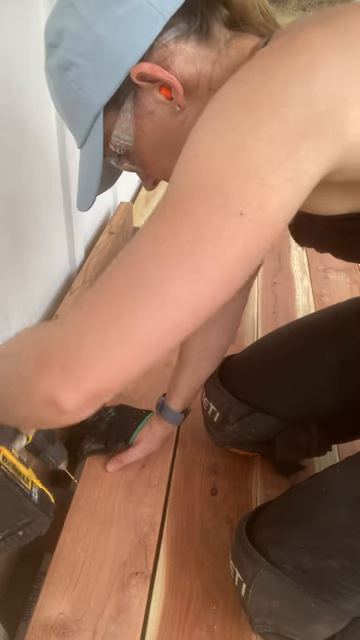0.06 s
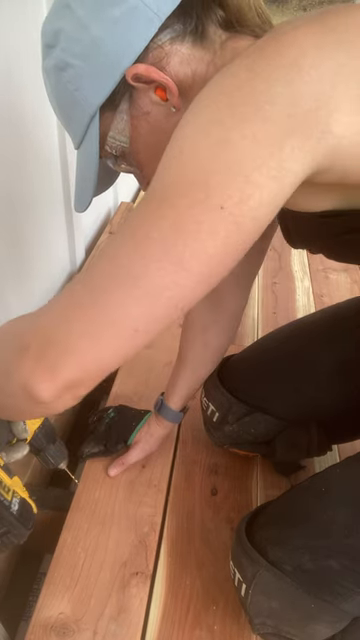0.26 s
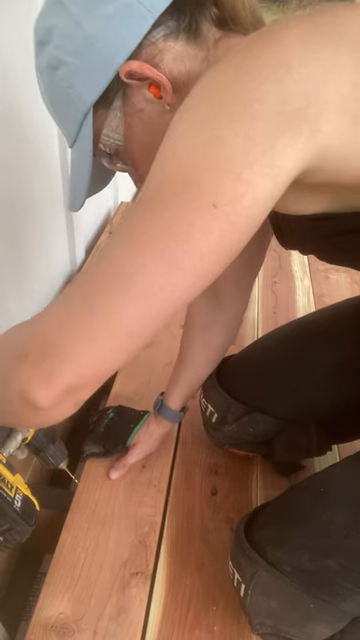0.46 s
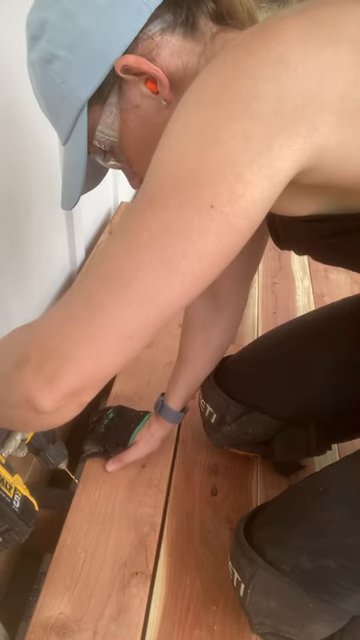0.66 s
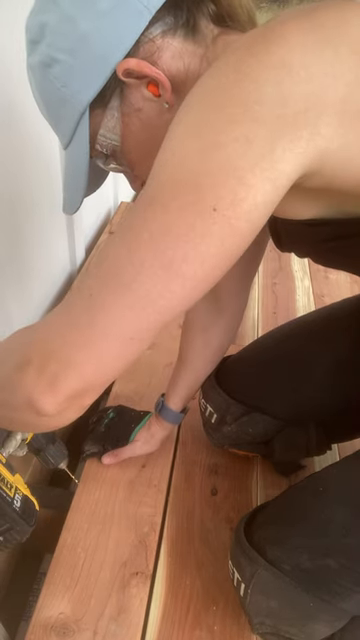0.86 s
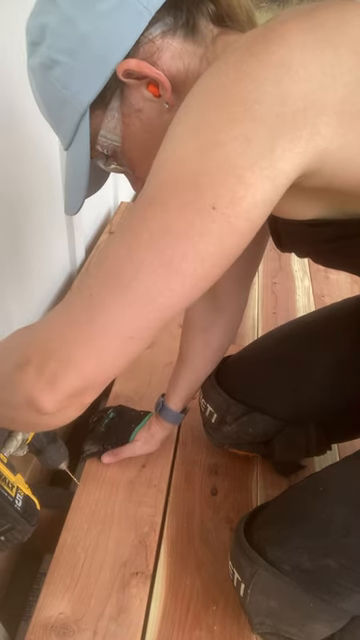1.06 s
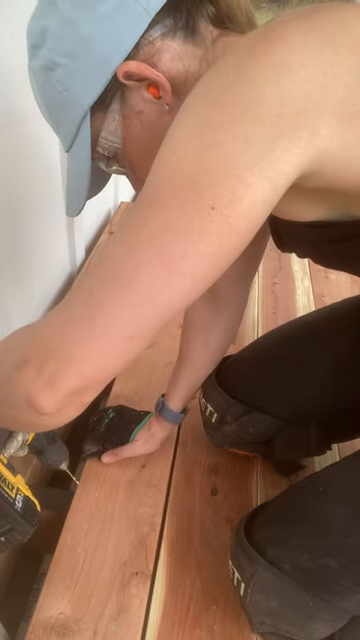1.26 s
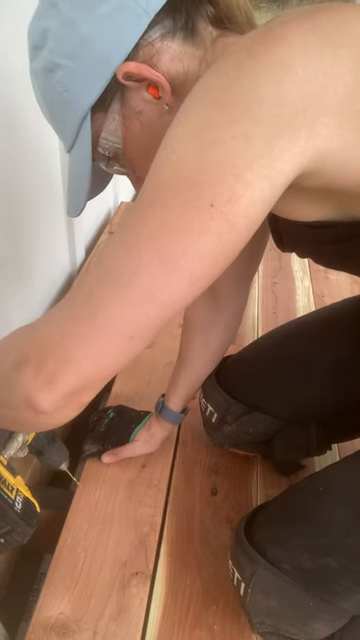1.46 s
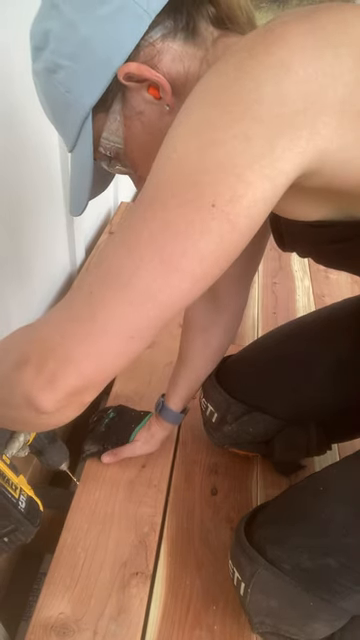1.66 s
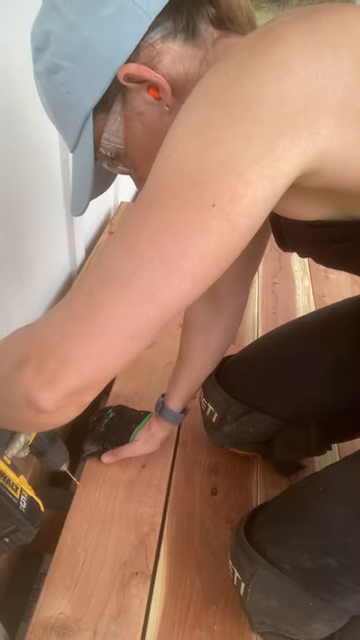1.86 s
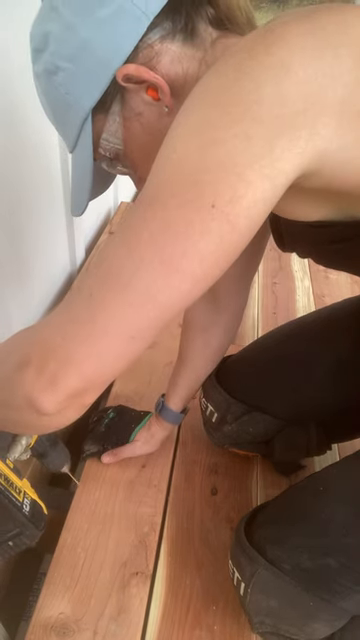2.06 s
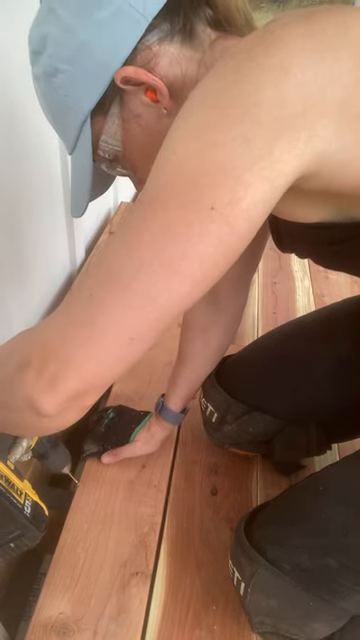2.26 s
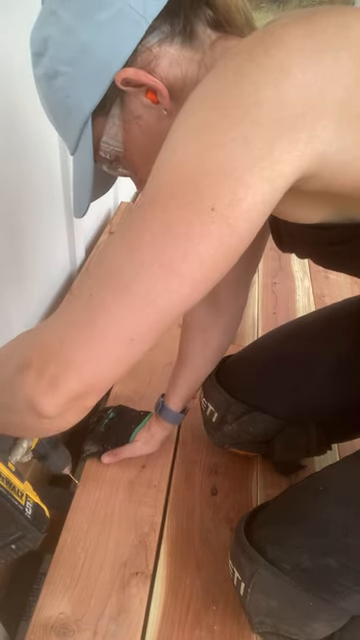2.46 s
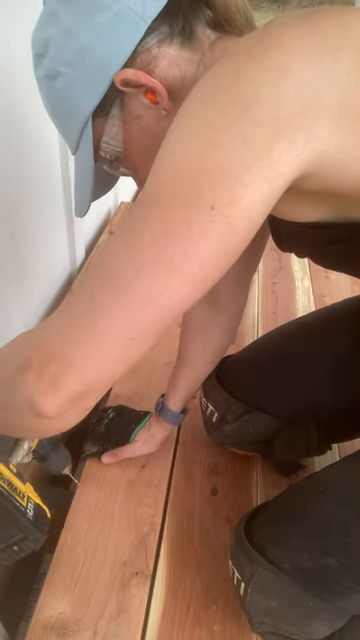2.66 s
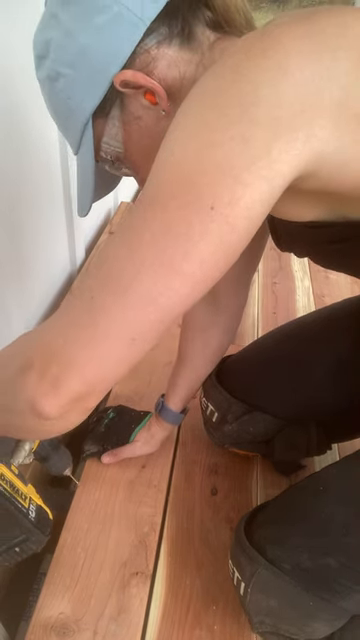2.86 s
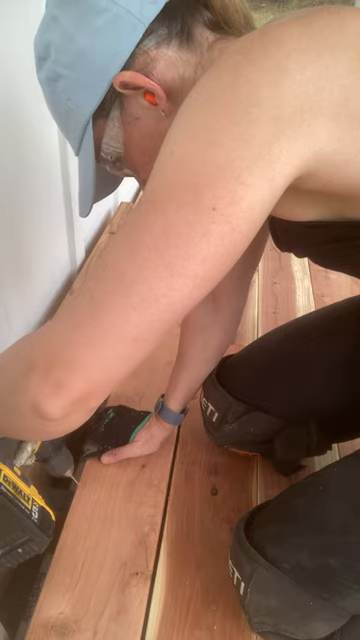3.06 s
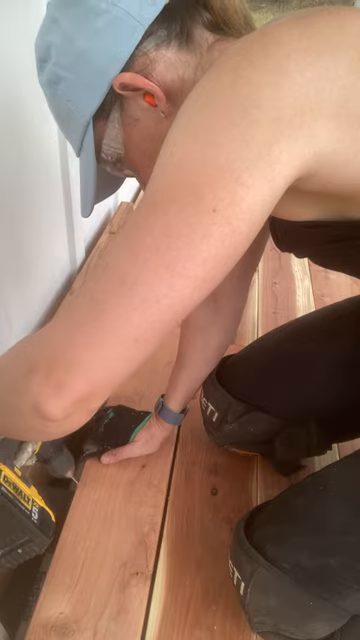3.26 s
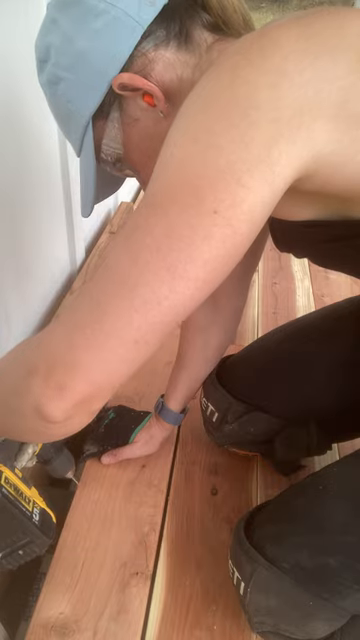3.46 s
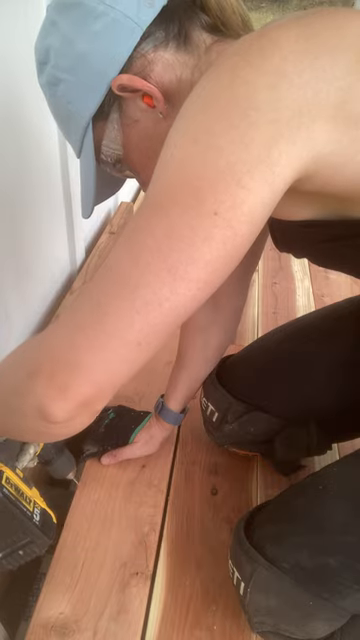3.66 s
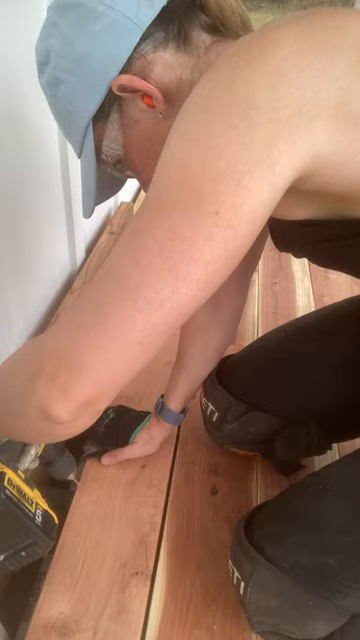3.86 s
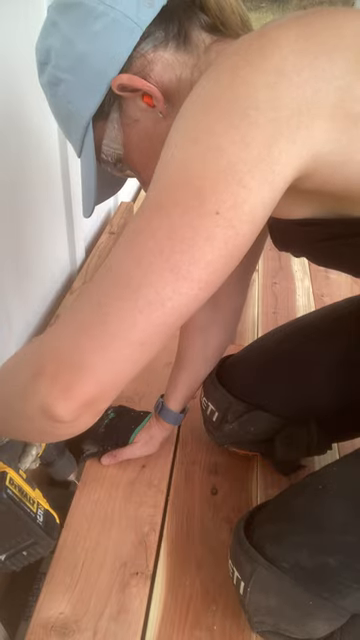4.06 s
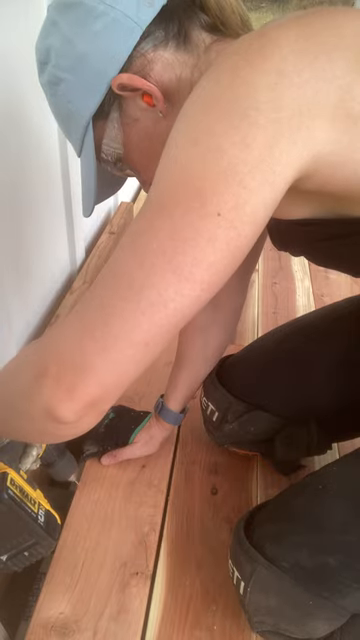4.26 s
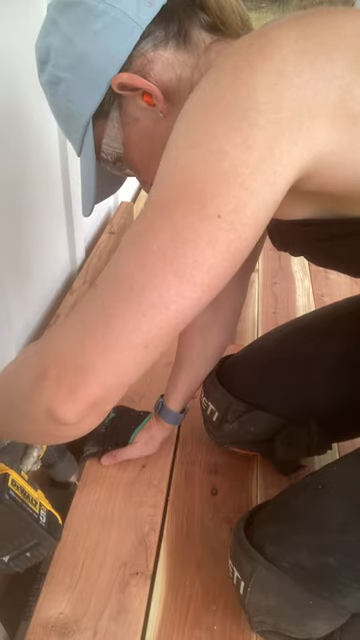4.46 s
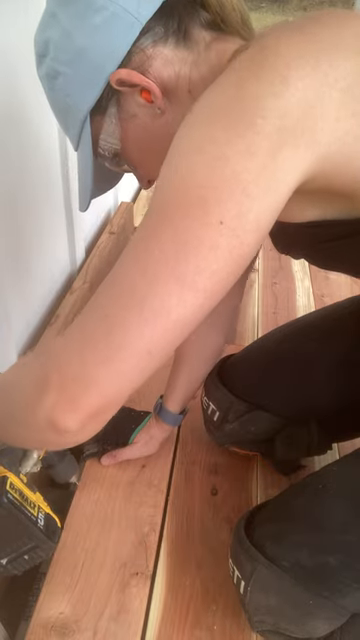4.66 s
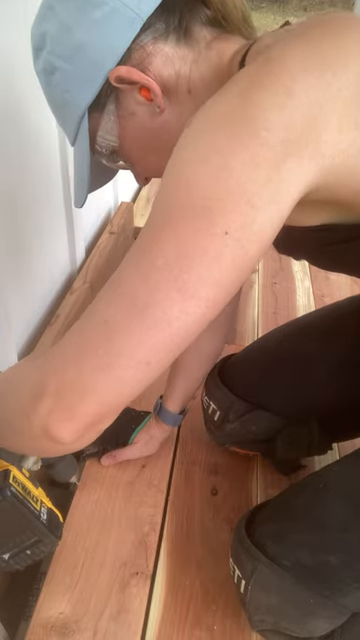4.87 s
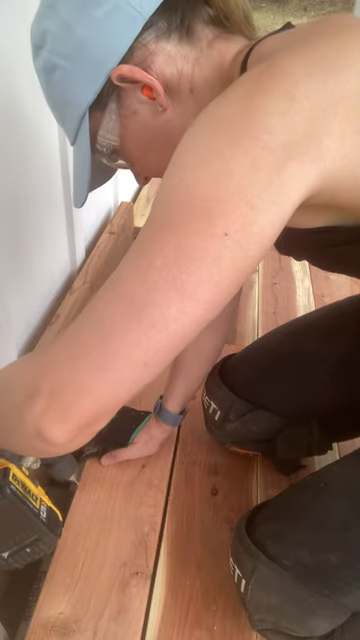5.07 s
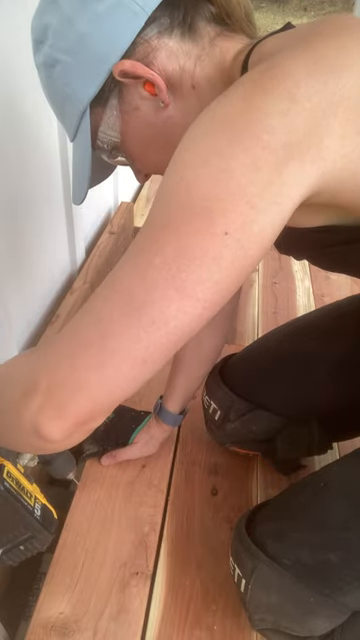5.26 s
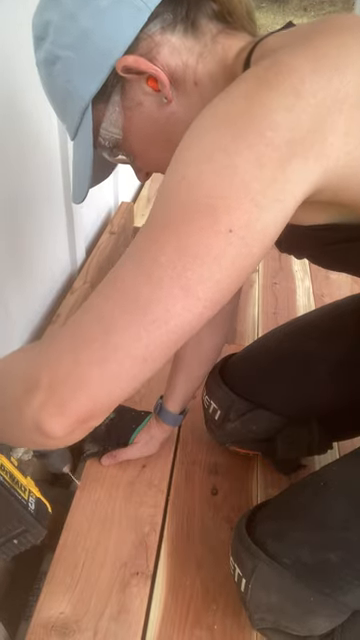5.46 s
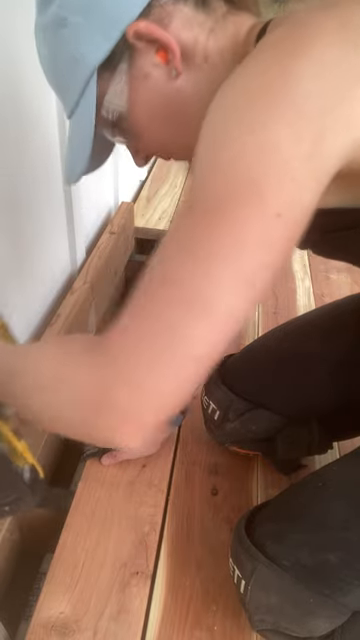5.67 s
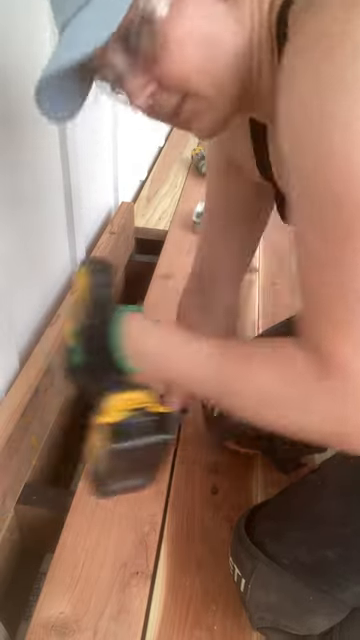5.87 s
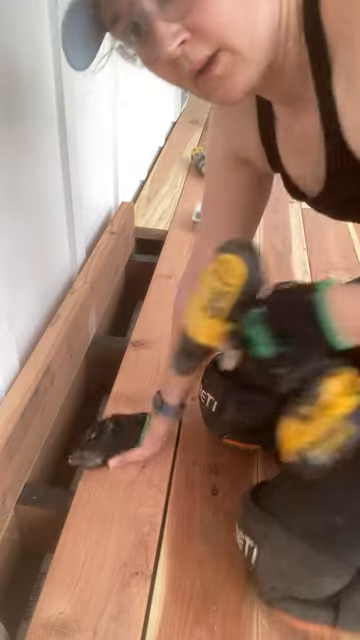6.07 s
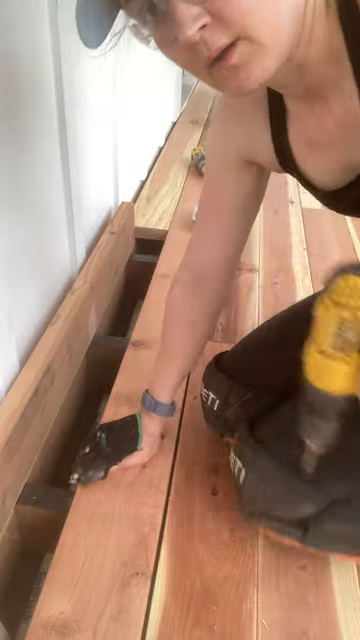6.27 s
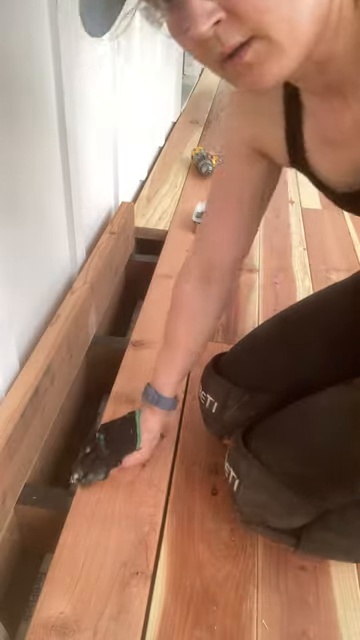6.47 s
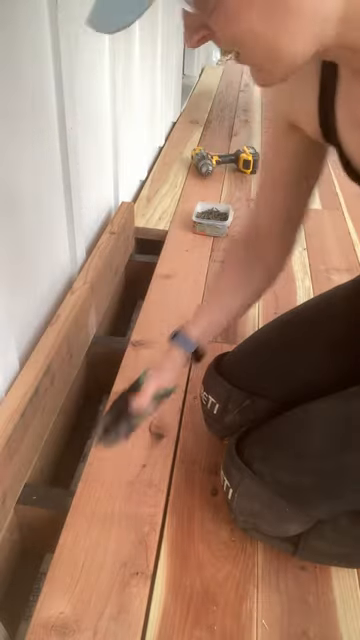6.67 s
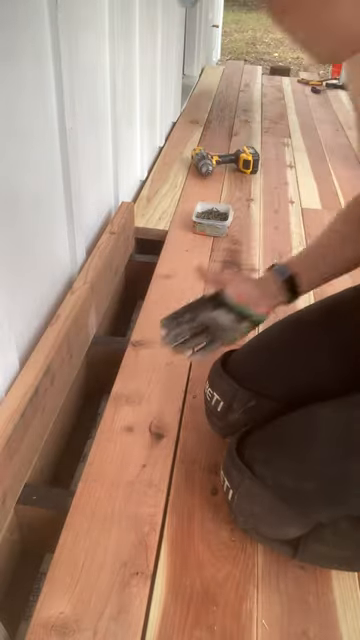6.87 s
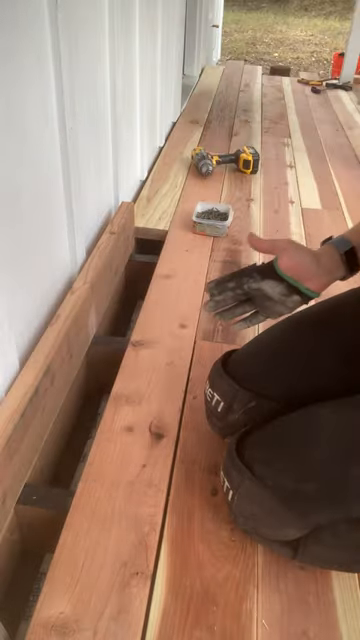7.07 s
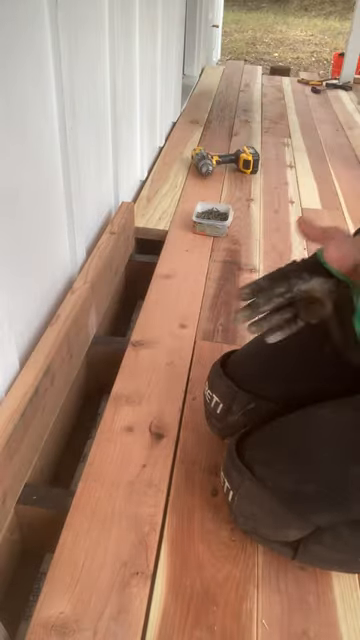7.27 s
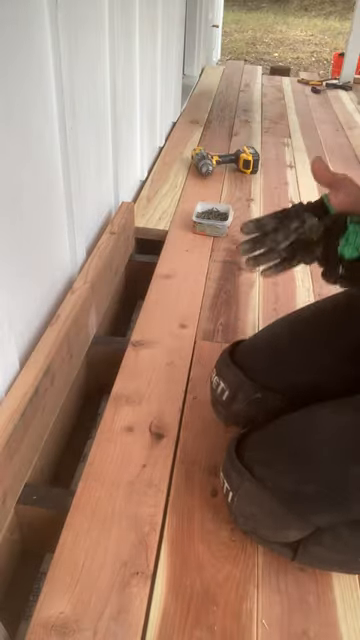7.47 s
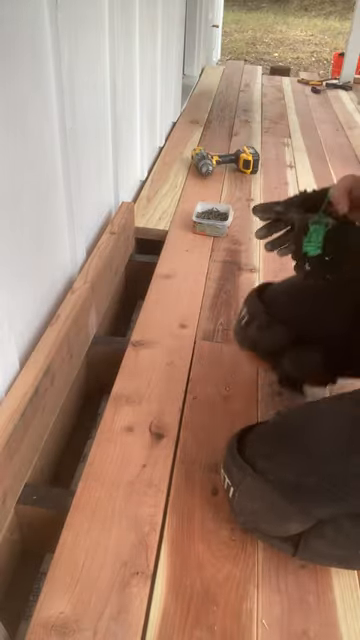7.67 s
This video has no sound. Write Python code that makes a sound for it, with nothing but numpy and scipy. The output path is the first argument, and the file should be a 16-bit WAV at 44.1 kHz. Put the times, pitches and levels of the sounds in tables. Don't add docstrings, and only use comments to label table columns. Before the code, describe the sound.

Knees thump on deck boards, a power drill ramps up and rasps through a long screw drive, stops sharply, cloth rustles, tool clunks down.

```python
import sys
import numpy as np
from scipy import signal
from scipy.fft import rfft, irfft
from scipy.io import wavfile
from scipy.ndimage import uniform_filter1d

SR = 44100
rng = np.random.default_rng(int(sys.argv[2]) if len(sys.argv) > 2 else 0)


def dump_mix(stems):
    frames = np.atleast_2d(stems).T
    limited = np.clip(frames, -1, 1)
    pcm = np.round(limited * 32767).astype(np.int16)
    wavfile.write(sys.argv[1], SR, pcm)


def boost_factor(decibels):
    exponent = np.asarray(decibels, float) / 20
    return 10 ** exponent


N = 340965
HZ = np.fft.rfftfreq(N, 1 / SR)
T = np.arange(N) / SR


def noise():
    return rng.standard_normal(N)


def level(x, db):
    return x * boost_factor(db) / np.sqrt(np.mean(x ** 2))


def shape(table, hz=HZ):
    f, db = np.transpose(table)
    return np.interp(np.log(hz + 1), np.log(f + 1), db)


def peaks(table):
    return sum(db / (1 + ((HZ - hz) / (width / 2)) ** 2) for hz, width, db in table)


def colour(x, db):
    return irfft(rfft(x) * boost_factor(db), N)


def band(x, lo_hz, hi_hz):
    return signal.sosfilt(signal.butter(2, [lo_hz, hi_hz], "band", fs=SR, output="sos"), x)


def walk(rate):
    hold = int(SR / rate)
    steps = np.repeat(rng.standard_normal(N // hold + 1), hold)
    return 1.176 * uniform_filter1d(uniform_filter1d(steps, hold), hold)[:N]


def burst(s, db, t60, rise=0.00078):
    age = np.clip(T - s, 0, 2)
    return boost_factor(db) * np.minimum(age / rise, 1) * 10 ** (-3 * age / t60)


def swells(rows):
    power = 0
    for s, length, *db in rows:
        arc = np.sin(np.pi * np.clip((T - s) / length, 0, 1)).clip(0) ** 0.77
        power = power + (boost_factor(np.array(db))[:, None] * arc) ** 2
    return np.sqrt(power)


# (frequency [Hz], level [dB per Hz])
HUSH = [(59, -34), (100, -14), (206, -12), (373, -17.5), (406, -8.5), (502, -22), (691, -17.5), (3050, -40),
        (10900, -39), (16000, -46)]
# (start [s], length [s], joist boom [dB], wind [dB])
SWAYS = [(.05, 0.35, -66, -57), (.44, 0.16, -67, -68), (.85, 0.65, -51.5, -58), (1.5, 1, -52, -63),
         (2.25, 0.52, -51.5, -63), (2.8, 0.25, -48.5, -68), (3.2, 0.35, -56, -52), (3.55, 0.21, -54, -58),
         (3.7, 0.59, -46.5, -64), (4.55, 0.67, -43, -62), (5.15, 0.63, -50, -49), (5.9, 0.17, -60, -56),
         (6.1, 0.68, -58, -58), (6.88, 0.18, -41, -60), (7.05, 0.19, -54, -40), (7.3, 0.22, -55, -58)]


def air():
    boom_gain, wind_gain = swells(SWAYS)
    hush = level(colour(noise(), shape(HUSH)), -69)
    boom = level(band(band(noise(), 85.4, 124.0), 51, 195), 0)
    wind = level(band(band(noise(), 43.0, 78.0), 30, 98), 0)
    breeze = boost_factor(-70 + 2.5 * T)
    return hush + boom * np.hypot(boom_gain, boost_factor(-62.5)) + wind * np.hypot(wind_gain, breeze)


# (start [s], length [s], cloth hiss [dB], scrape [dB])
RUSTLE = [(-.05, 0.098, -93, -69), (.13, 0.19, -72.5, -74), (.33, 0.3, -82, -69.5), (.36, .09, -72, -85),
          (.45, 0.37, -78.5, -92), (.8, 0.088, -75, -90), (5.73, 0.033, -60, -50.5),
          (5.76, .13, -64, -54.5), (5.88, 0.21, -65, -67), (6.0, 0.27, -56.5, -56),
          (6.115, 0.054, -51, -45), (6.14, 0.16, -55.5, -55), (6.27, 0.1, -55, -52),
          (6.38, 0.12, -58.5, -62), (6.5, 0.23, -49.5, -59), (6.748, 0.027, -51, -48),
          (6.76, 0.06, -54.5, -60), (6.84, 0.23, -58, -59), (7.0, 0.15, -59, -47), (7.21, .065, -68, -56.5),
          (7.33, 0.088, -55.5, -55.5), (7.4, 0.094, -57.5, -51.5), (7.45, 0.42, -84, -58.5),
          (7.52, 0.12, -65, -70)]
# (frequency [Hz], level [dB per Hz])
CLOTH = [(120, -4), (200, -1), (350, -5), (689, -11), (941, -5), (1260, -9), (1700, -9.5), (2650, -13.5),
         (3350, -15), (8560, -15.5), (16000, -20)]
# (start [s], end [s], pitch [Hz], width [Hz],
# level [dB])
SQUEAKS = [(4.92, 5.39, 455, 81, -43), (0.97, 1.51, 256, 53, -53.5), (5.44, 5.623, 150, 50, -49),
           (5.72, 5.87, 2430, 610, -56), (6.16, 6.32, 1930, 790, -60), (6.5, 6.68, 1900, 970, -59),
           (5.93, 4.3, 4650, 540, -77), (5.74, 5.9, 8500, 900, -69), (6.7, 6.2, 7400, 400, -81),
           (0.2, 0.27, 4000, 500, -80), (0.4, .54, 5000, 700, -82), (6.17, 6.29, 4600, 300, -61),
           (6.5, 6.852, 3350, 450, -65)]


def rustle():
    grains = noise() * boost_factor(2.0 * walk(300) + 1.0 * walk(40))
    cloth = rfft(grains) * boost_factor(shape(CLOTH))
    bright = 1 / (1 + (2800 / (HZ + 1)) ** 6)
    hiss = level(irfft(cloth * bright, N), 0)
    scrape = level(irfft(cloth * (1 - bright), N), 0)
    stir = np.outer(boost_factor(np.array((-65.5, -60.5))), T > 4.4)
    out = np.sum(np.hypot(swells(RUSTLE), stir) * [hiss, scrape], axis=0)
    for t0, t1, hz, width, db in SQUEAKS:
        swell = np.sin(np.pi * np.clip((T - t0) / (t1 - t0), 0, 1)) ** 0.81
        out = out + swell * level(band(grains, hz - width / 2, hz + width / 2), db)
    return out


# (time [s], peak [dB], pitch [Hz], t60 [s])
TICKS = [(0.104, -28, 8200, 0.02), (0.1217, -25.5, 4500, 0.02), (0.141, -36, 4000, 0.017),
         (0.4614, -59, 4960, 0.015), (0.5571, -58, 4170, 0.015), (0.6115, -50, 7660, 0.012),
         (0.7856, -59, 8290, 0.015), (0.8175, -50, 7840, 0.015), (6.2901, -42, 3390, .015),
         (6.396, -35, 6260, 0.015), (6.4373, -37, 8340, 0.015), (6.472, -33, 8420, 0.015),
         (6.5096, -41, 8650, 0.015), (6.5231, -41, 4220, .015), (6.5544, -38, 3480, 0.014),
         (6.685, -30, 7680, 0.017), (6.7134, -26.5, 5000, 0.015), (6.719, -34, 5200, .012),
         (6.728, -33, 7500, .012), (6.744, -34, 5200, .012), (6.751, -36, 5300, .012),
         (6.758, -25, 7160, 0.01), (6.8379, -35, 7530, 0.015), (6.86, -37, 3320, 0.013),
         (6.8936, -33, 3500, 0.013), (6.905, -38, 7500, .012), (6.914, -42, 5200, .012),
         (6.925, -20, 4220, 0.014), (6.9455, -31, 8500, .012), (7.0284, -25, 3210, 0.0075),
         (7.0525, -9, 3520, 0.0098), (7.15, -39, 8500, .012), (7.1596, -38, 3200, 0.015),
         (7.1865, -33, 4170, 0.012), (7.214, -38, 3290, 0.015), (7.243, -33.5, 3160, 0.011),
         (7.251, -38, 3300, .02), (7.283, -33, 3220, 0.012), (7.305, -44, 3330, 0.018),
         (7.3462, -40, 7460, 0.015), (7.386, -39, 8000, .012), (7.417, -31, 8780, 0.012),
         (7.4425, -38, 4750, 0.013), (7.4599, -31.5, 9500, 0.013), (7.575, -46, 8500, .015)]
# (time [s], peak [dB], pitch [Hz], t60 [s])
TAPS = [
    (0.103, -31.5, 880, 0.13),
    (0.352, -44.5, 1500, 0.028),
    (.838, -56, 4000, .08),
    (6.079, -51, 861, 0.05),
    (6.134, -31.5, 950, 0.046),
    (6.329, -56, 890, 0.05),
    (6.759, -32, 990, 0.042),
]


def ticks():
    click = noise()
    wide = level(band(click, 2700, 14300), -12.0)
    out = 0
    for s, db, hz, t60 in TICKS:
        out = out + burst(s, db, t60) * (level(band(click, hz, hz * 1.07), -15.0) + wide)
    for s, db, hz, t60 in TAPS:
        out = out + burst(s, db, t60) * level(band(click, hz * 0.66, hz * 1.37), -8.0)
    return out


def ring(force, modes, lag):
    out = 0
    for k, (hz, db, t60) in enumerate(modes):
        late = np.roll(force, int(lag / np.sqrt(hz) * SR))
        for twin in (1, 1.04):
            pole = np.exp(2j * np.pi * hz * twin / SR - np.log(1000) / (t60 * SR))
            out = out + (-1) ** k * boost_factor(db) * signal.lfilter([1], [1, -pole], late).imag
    return out


def knocks(hits, modes, gain_db, rattle_db, rattle_t60, lag):
    force, crack, rattle = np.zeros(N), 0, noise()
    for s, db, ms, crack_db in hits:
        contact = np.clip((T - s) / (ms / 1000), 0, 1)
        force += boost_factor(db) * np.sin(np.pi * contact) / (ms * SR / 1000)
        force += boost_factor(rattle_db) * burst(s, db, rattle_t60) * rattle
        crack = crack + burst(s, db + crack_db, 0.016, 0.003) + burst(s, db + crack_db - 10.5, 0.12, 0.0095)
    wood = [(300, -25), (900, 12.0), (2000, 7.0), (2900, 3.5), (3600, 8.5), (4600, 0.0), (8000, -1.0), (16000, -17)]
    return boost_factor(gain_db) * band(ring(force, modes, lag), 40, 5000) + crack * colour(noise(), shape(wood))


# (time [s], peak [dB], contact [ms], crack re blow [dB])
THUDS = [
    (0.114, -19.5, 9.5, -20.5),
    (0.189, -38, 2.8, -40),
    (0.34, -25, 4.2, -39),
    (0.41, -43, 3.7, -38),
]
# (frequency [Hz], level [dB], t60 [s])
JOIST = [(65, -13.5, .4), (96, 2.5, 0.12), (121, 2, 0.22), (171, -15, 0.21), (230, -10.5, 0.092),
         (422, -24, 0.073), (560, -28, 0.068), (745, -27, 0.032)]


def knees():
    return knocks(THUDS, JOIST, -1.7, -31.0, 0.18, 0.0275)


# (time [s], peak [dB], contact [ms], crack re blow [dB])
BLOWS = [
    (6.926, -4, 1.68, -21.5),
    (6.943, -14.5, 2.1, -35),
    (7.023, -12, 1.8, -17),
    (7.051, 2.5, 0.61, -16.5),
    (7.065, -6.5, 1.15, -39.5),
    (7.087, -20, 1.2, -41),
    (7.119, -20.5, 1.6, -33),
]
# (frequency [Hz], level [dB], t60 [s])
DECK = [(100.7, -6, 0.33), (123.2, -8, 0.39), (160, -8.5, 0.33), (230.6, -0.5, 0.3), (258, -1.5, 0.31),
        (308, 3, 0.27), (330, -4.5, 0.3), (410, -2.5, 0.14), (522, 0, 0.09), (615, 4.5, 0.055),
        (722, -2.5, 0.034), (918, -1, 0.048), (1080, -20, 0.045), (1390, -16.5, 0.073), (1550, -18, 0.035)]


def tool_set_down():
    return knocks(BLOWS, DECK, -15.0, -31.5, 0.098, 0.016)


# (time [s], commutator tone the rotor heads for [Hz])
TRIGGER = [(.85, 1250), (1.04, 1360), (1.2, 1530), (1.34, 1530), (1.65, 1850), (1.72, 2150), (1.84, 2250),
           (1.86, 3255), (2.845, 3250), (2.86, 3893), (4.2, 3893), (4.64, 3865), (4.7, 3520), (4.86, 3280),
           (4.92, 3380), (5.1, 3345), (5.3, 3372)]
# (time [s], level [dB])
EFFORT = [(0.84, -56), (1.06, -46.5), (1.27, -42.5), (1.73, -39), (1.85, -36.5), (1.99, -34.5),
          (2.09, -33.5), (2.25, -33), (2.5, -32), (2.85, -30.5), (2.98, -28.5), (3.21, -27), (3.58, -27),
          (4.11, -27), (4.66, -27), (4.9, -27.5), (5.12, -29.5), (5.42, -32.5)]
BARS = 12
SEATED_S, STOP_S = 5.42, 5.712


def motor():
    s, aim_hz = np.transpose(TRIGGER)
    lag = 1 / (0.22 * SR)
    bar_hz = signal.lfilter([lag], [1, lag - 1], np.interp(T, s, aim_hz, left=0))
    stall_hz = 9400 * np.clip(T - SEATED_S, 0, STOP_S - SEATED_S) ** 2
    engage = np.clip((T - EFFORT[0][0]) / 0.03, 0, 1) ** 2
    gate = engage * boost_factor(-60 * np.clip(T - STOP_S, 0, 1) / 0.081)
    return (bar_hz - stall_hz) / BARS, stall_hz, np.interp(T, *np.transpose(EFFORT)), gate


# (frequency [Hz], rms level [dB])
SWITCH = [(3919, -82), (7838, -56), (11763, -61.5), (15680, -74)]
# (time [s], level [dB])
SWITCH_FADE = [
    (.833, -25),
    (.845, 0),
    (1.3, 1),
    (1.9, -2),
    (2.4, -16),
]


def speed_switch(turn):
    chop = sum(boost_factor(db) * np.sin(2 * np.pi * hz * T) for hz, db in SWITCH)
    fade = boost_factor(np.interp(T, *np.transpose(SWITCH_FADE), left=-150, right=-150))
    return np.sqrt(2) * fade * chop * (1 + .5 * np.sin(turn * 3))


# (time [s], peak [dB], pitch [Hz])
BRAKE = [
    (5.681, -16, 1920),
    (5.706, -13, 1980),
]


def brake():
    out = 0
    for s, db, hz in BRAKE:
        out = out + burst(s, db, 0.015) * level(band(noise(), hz * 0.63, hz * 1.24), -9.0)
    return out


# (low edge [Hz], high edge [Hz], level re effort [dB], loss from 2.8 s on, once the shaft runs
# at full speed [dB])
FANS = [(15150, 15550, -12, 8), (14400, 14800, -20, 1)]


def vents(rasp, shaft_hz, effort_db):
    out = 0
    for lo_hz, hi_hz, db, drop_db in FANS:
        fan = boost_factor(effort_db + db - drop_db * (T >= 2.8))
        fan = fan * np.clip(shaft_hz / 190, 0, 1) ** 2
        out = out + fan * level(band(rasp, lo_hz, hi_hz), 0)
    return out


# (frequency [Hz], level re effort [dB])
BAR_TONE = [(400, -14), (830, -29), (1330, -8.5), (1500, -9), (1680, -19), (1850, -9), (2300, -13),
            (2850, -9), (3100, -8), (3250, -8.5), (3400, -12.5), (3850, -10.5)]
# (frequency [Hz], level re effort [dB])
PLANET_TONE = [(150, -17), (340, -15), (470, -20), (600, -24), (850, -16), (1050, -11), (1250, -14),
               (1340, -18), (1400, -10), (1600, -24)]


def motor_tones(turn, shaft_hz, stall_hz, effort_db, pull):
    waver_db = 2.3 * pull - 1.5 + 2.06 * walk(30) + 1.6 * walk(7.9)
    bar_db = effort_db + shape(BAR_TONE, BARS * shaft_hz) + waver_db - 9 * (stall_hz / 650) ** 4
    bars = np.sqrt(2) * boost_factor(bar_db) * np.sin(BARS * turn)
    planet_order = 4.96
    planet_db = effort_db + shape(PLANET_TONE, planet_order * shaft_hz) + 3.8 * walk(45) + 7 * (shaft_hz < 120)
    jitter = np.minimum(shaft_hz / 120, 2.4) * walk(110)
    return bars + boost_factor(planet_db) * np.sin(planet_order * turn + jitter)


STRONG = {4: 7, 5: 3, 6: 4, 7: 6, 8: 0, 9: 0, 10: 8, 11: 8, 12: -20, 13: 3, 14: 0, 15: 8, 16: 7.5, 17: 3,
          18: 2, 19: -1, 20: 10.5, 21: 12, 22: 9.5, 24: 8, 25: 13.5, 26: 8, 27: 8.5, 28: 8, 30: 16.5, 31:
          10.5, 32: 11, 33: 10, 35: 11, 36: 10.5, 39: 7, 37: 7, 41: 13, 44: 3, 58: 10, 59: 11, 47: 12, 48:
          12, 51: 13, 54: 7, 57: 11, 60: 11, 69: 14}
WAKING = {11: 0, 45: -4, 49: 6, 13: 9, 15: 9, 27: 6, 30: -5, 32: -7, 33: -8, 34: -3, 35: 1, 41: 3, 25: -3,
          47: 2}
SLEEPING = {25: -4, 30: -6, 36: -3, 41: -11, 47: -4, 48: -5, 51: -6, 54: -4, 57: -5, 20: -3, 22: -3, 60: -3,
            67: 6, 69: -6}
LOADED = {5: 5, 15: 3, 27: -3, 31: 2, 33: 2, 35: -3, 38: 5, 39: 4, 40: 3, 41: 5, 54: 7, 56: 3}
PULLING = {20: 2, 23: 3, 25: 3, 26: 4, 27: 7, 30: 3, 35: 2, 36: 7, 38: 4, 39: 3, 51: 1}


def shaft_orders(turn, shaft_hz, stall_hz, pull):
    wander = [0.73 * (walk(10) + walk(45)) for _ in range(6)]
    awake = np.interp(shaft_hz, (290, 319), (0, 1))
    asleep = np.interp(shaft_hz, (240, 258), (1, 0))
    loaded = np.interp(T, (4.85, 4.97), (0, 1))
    comb = 0
    for k in range(4, 72):
        db = STRONG.get(k, 6.0) + WAKING.get(k, 0) * awake + SLEEPING.get(k, 0) * asleep
        db = db + LOADED.get(k, 0) * loaded + PULLING.get(k, 0) * pull * (1 - asleep / 2)
        db = db + 2.3 * np.roll(wander[k % 6], 9000 * k)
        audible = shaft_hz * k < .45 * SR
        comb = comb + audible * boost_factor(db) * np.sin(k * turn + k * k)
    return comb * np.clip(shaft_hz / 270, 0, 1) ** 0.71 * boost_factor(-12 * stall_hz / 1000)


def shaft_hum(turn):
    hum = boost_factor(13.0 + 2.0 * walk(18)) * np.sin(turn) + boost_factor(8.0 + 4.0 * walk(16)) * np.sin(0.79 * turn)
    return hum * boost_factor(np.interp(T, (4.8, 4.89), (0, -9.5)))


# (frequency [Hz], level [dB per Hz])
HOUSING = [(88, -10), (150, -2.5), (260, -6), (330, -2), (450, -3.5), (700, -5), (1390, -3), (3040, -9),
           (3770, -6.5), (5680, -11), (7920, 1.5), (11000, -3), (12400, -3.5), (15700, -10.5)]
# (frequency [Hz], width [Hz], level [dB])
SHELL = [(248.7, 47, 9.5), (322, 47, 3), (1095, 990, 6), (2297, 840, 7.5), (3550, 300, 2.5),
         (4500, 940, 4.5), (8300, 160, 0), (8570, 690, 2), (11000, 830, 6.5), (14500, 700, 9.5),
         (15250, 500, 6)]
# (frequency [Hz], width [Hz], level [dB])
RIBS = [(4215, 110, 2), (4520, 120, 7), (4865, 400, 6), (5190, 120, 4), (8060, 200, 10), (8760, 260, 4.5),
        (9340, 160, 5), (10060, 150, 8), (11030, 300, 8.5), (11500, 520, 6.5)]
# (frequency [Hz], width [Hz], level [dB])
BOARD = [(238, 25, 3), (262, 9, 12.5), (328.4, 33, 12)]
EDGES_HZ = [0, 650, 3200, 6200, 12300, 22050]
# (full-effort level [dB], share of effort changes, stall loss [dB per kHz], gain as screw sinks [dB per s])
PARTS = [(-41, 0.55, 28, 1.4), (-35, 0.69, 2, 0.7), (-35, 0.87, 0, 0.12), (-28, 0.92, 2, 0.08),
         (-36, 0.77, 6, 1)]


def housing(rasp, comb, hum, shaft_hz, stall_hz, effort_db):
    lines = rfft(comb) * boost_factor(peaks(RIBS) - 29.5) + rfft(hum) * boost_factor(peaks(BOARD) - 39.0)
    body = (rfft(rasp) + lines) * boost_factor(shape(HOUSING) + peaks(SHELL))
    out = 0
    for lo, hi, (db, share, stall_db, sink_db) in zip(EDGES_HZ, EDGES_HZ[1:], PARTS):
        db = db + share * (effort_db + 27) - stall_db * stall_hz / 1000 + sink_db * (T - 3.63)
        bite = 1
        if lo == 0 or lo > 3000:
            bite = np.minimum(shaft_hz / 48.3, 1) ** 0.74
        if lo > 6000:
            bite = bite * np.clip(shaft_hz / 120, 0, 1) ** 0.43
        part = irfft(body * (HZ >= lo) * (HZ < hi), N)
        out = out + bite * boost_factor(db) * level(part, -0.81)
    return out


def drill():
    shaft_hz, stall_hz, effort_db, gate = motor()
    pull = np.clip(np.gradient(shaft_hz) * SR / 25, 0, 1)
    hunting = 1 + 0.000873 * walk(30) + .0008 * walk(9)
    turn = 2 * np.pi * np.cumsum(shaft_hz * hunting) / SR
    rasp = noise() * boost_factor(0.86 * walk(400) + 0.94 * walk(24.98)) * (1 + 0.076 * np.cos(turn))
    comb = shaft_orders(turn, shaft_hz, stall_hz, pull)
    running = motor_tones(turn, shaft_hz, stall_hz, effort_db, pull)
    running = running + housing(rasp, comb, shaft_hum(turn), shaft_hz, stall_hz, effort_db)
    running = running + vents(rasp, shaft_hz, effort_db)
    return gate * running + speed_switch(turn) + brake()


# (frequency [Hz], side re mid [dB])
PORTS = [(60, -3), (110, -5), (200, -10.5), (380, -5), (700, -0.5), (1290, -3), (2380, -4), (4400, -6.5),
         (8120, -22.5), (15000, -23)]


def scene():
    near = air() + rustle() + ticks() + knees() + tool_set_down() + drill()
    echo = rng.standard_normal((2, 6000)) * 10 ** (-3 * T[:6000] / 0.13)
    echo /= np.sqrt(np.sum(echo ** 2, axis=1, keepdims=True))
    mid = near + boost_factor(-16) * signal.fftconvolve(near, echo[0])[:N]
    tilt = shape([(70, -6.5), (200, -4.0), (500, -7.0), (6000, 4.5), (9000, -6)])
    side = colour(signal.fftconvolve(near, echo[1])[:N], shape(PORTS) + tilt)
    side = side - 0.29 * band(mid, 30, 210) - 0.18 * band(mid, 215, 490) - 0.45 * band(mid, 490, 734)
    side = side + level(band(noise(), 25, 60), -65) * boost_factor(3 * walk(3))
    return np.array([mid + side, mid - side])


def top_cut(x):
    return signal.sosfilt(signal.butter(12, 16810, fs=SR, output="sos"), x)


def record(dry):
    soft = np.tanh(dry / 1.05) * 1.05
    top = signal.ellip(10, .2, 80, 15850, fs=SR, output="sos")
    return top_cut(signal.sosfilt(top, soft))


dry = scene()
out = record(dry)
dump_mix(out)
```